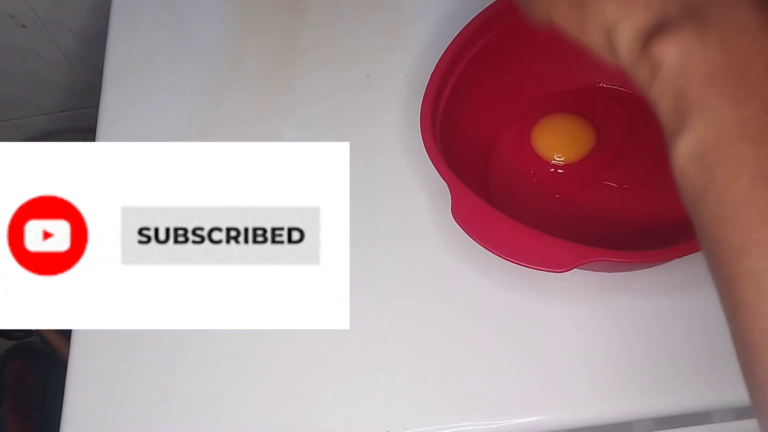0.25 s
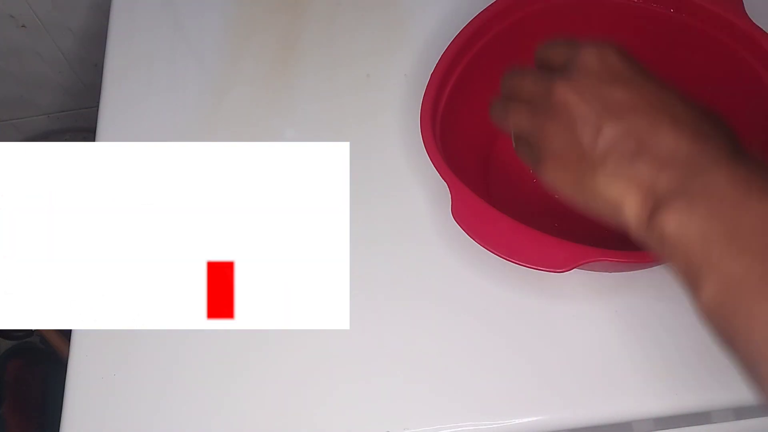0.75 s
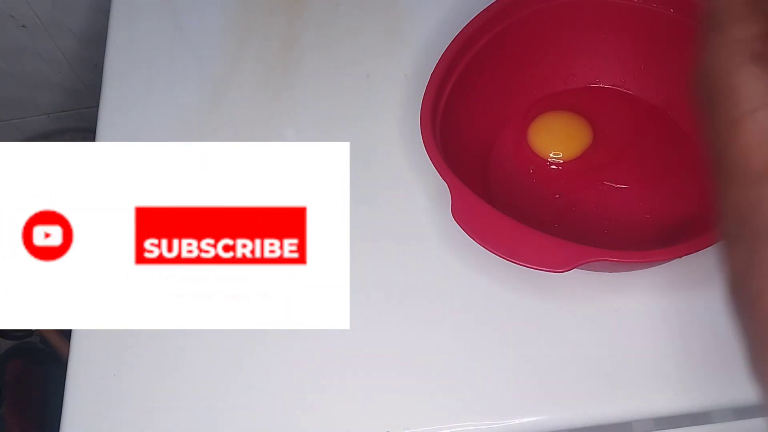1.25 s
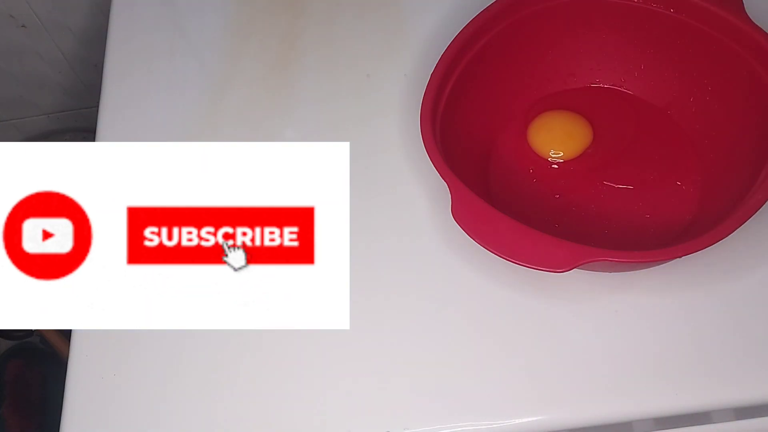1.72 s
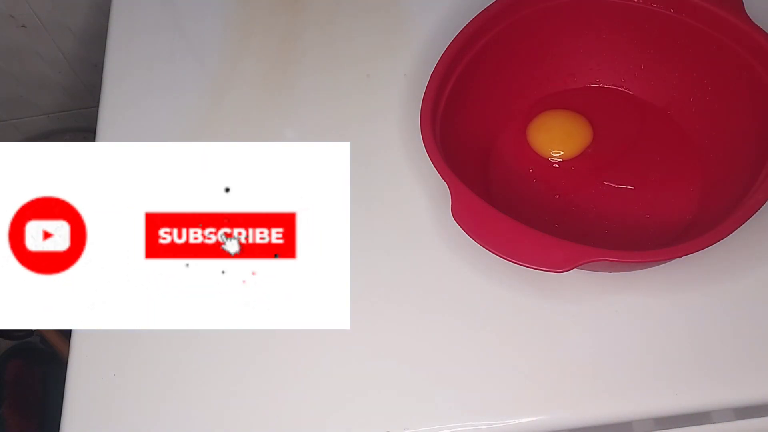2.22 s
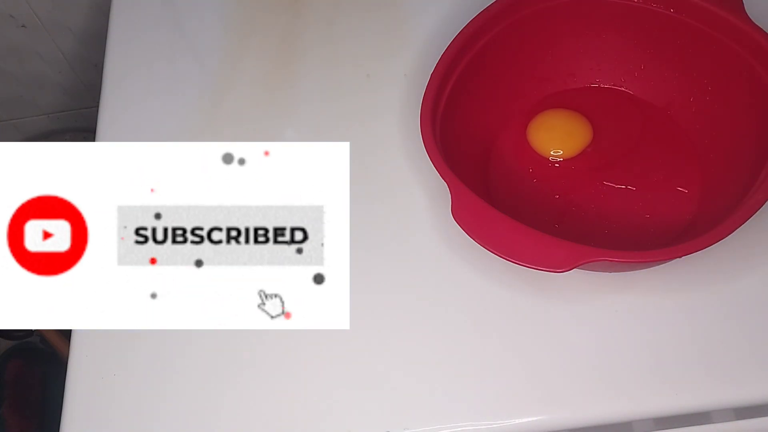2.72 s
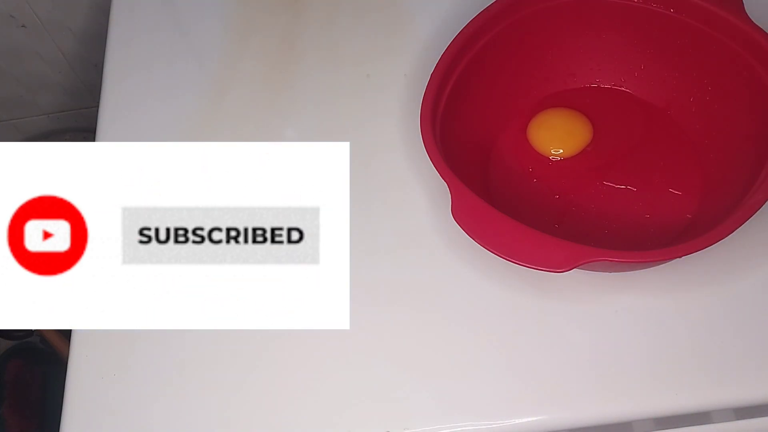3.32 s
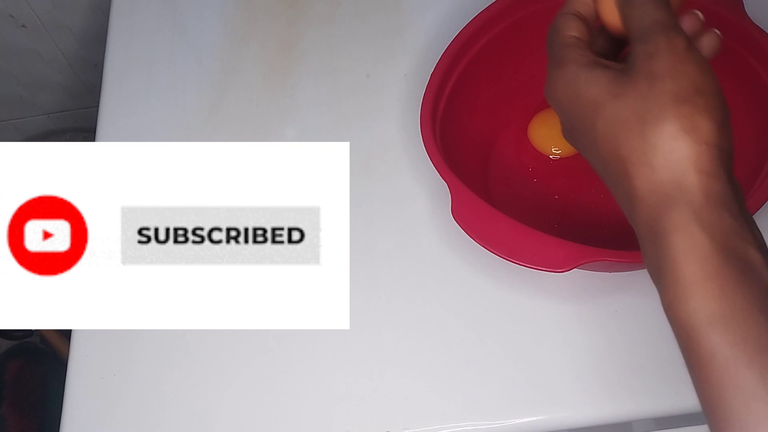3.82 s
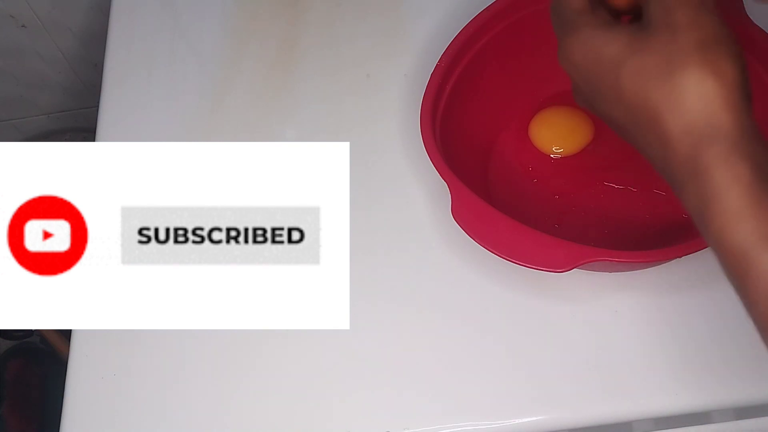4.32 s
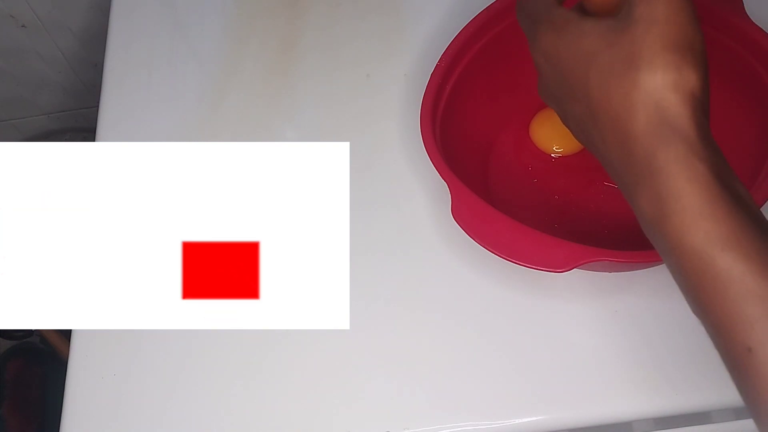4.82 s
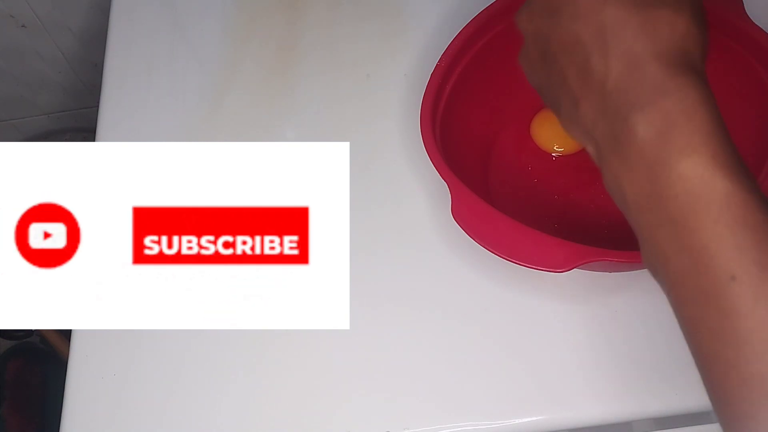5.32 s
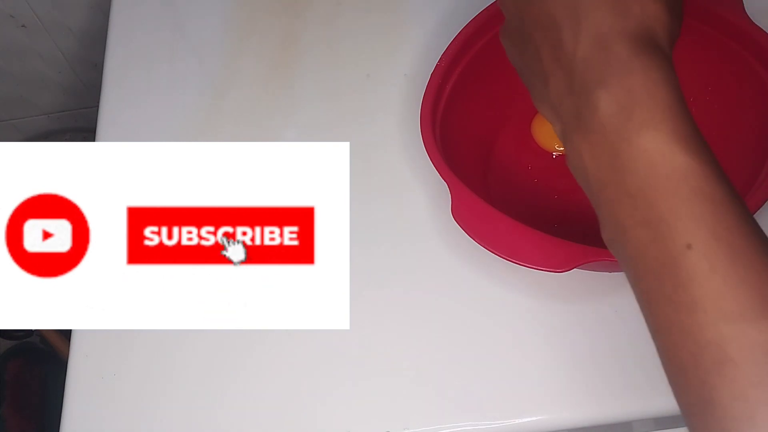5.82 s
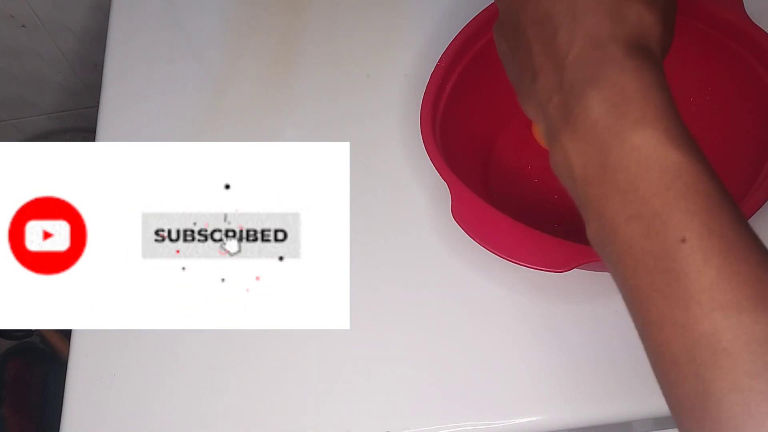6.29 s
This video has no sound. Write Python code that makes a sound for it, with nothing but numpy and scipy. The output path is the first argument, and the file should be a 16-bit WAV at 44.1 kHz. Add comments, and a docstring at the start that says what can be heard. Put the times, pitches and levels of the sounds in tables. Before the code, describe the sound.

A quiet, hard-walled kitchen with low rumble, faint hiss and weak wavering hum, heard close to the hands in stereo. Empty half eggshells knock with small dry clicks and brief hollow rings at 0.4, 0.5, 1.0 and 1.4 s, faintly at 1.8; soft finger rubs fall between them. Dull footstep-like knocks come from further off, from 1.25 s onward. At 2.25 s a cupboard catch clicks, then the door slams at 2.35 with a clatter and ringing boom that fades. Fingers rub shell at 3.5 and 3.9. A sharp tap on egg at 4.04, with a soft bowl bump, is followed by a harder, shorter, brighter one at 4.35. Shell ticks and snaps from 4.6, thickest around 5.0, thinning until 6.0. From 6.0 to 6.4 the plastic bowl booms low and softly amid snaps, and at 6.32 the shell tears in a tenth-second rasp falling in pitch.

```python
"""A low hum and faint air fill a quiet, hard-walled kitchen: wavering sines and coloured noise.
Empty half shells knock with clicks and short hollow rings; fingers rub and press shell in runs of tiny slips.
Soft knocks, like footsteps, go on further off, and a cupboard door bangs shut: noise bursts and ringing modes.
Two sharp taps, short coloured bursts, then break an egg by hand over a plastic bowl, which booms softly.
Shell snaps and crackles until the halves tear apart with a rasp of slips that falls in pitch."""
import sys
import numpy as np
from scipy import signal
from scipy.fft import rfft, irfft
from scipy.io import wavfile

SR = 44100
rng = np.random.default_rng(int(sys.argv[2]) if len(sys.argv) > 2 else 0)


def generate_wav(sig):
    """Save sig (samples, or channels by samples) to the path in sys.argv[1] as 16-bit PCM at SR."""
    pcm = np.round(np.clip(np.atleast_2d(sig).T, -1, 1) * 32767).astype(np.int16)
    wavfile.write(sys.argv[1], SR, pcm)


N = 288855
TIME = np.arange(N) / SR   # s

# All levels in the tables are relative, ahead of the mix of direct and room sound.
# Colour of skin and shell in friction. Each row: frequency in Hz, level in dB per Hz.
FRICTION_COLOUR = [(150, -15.5), (400, 2.5), (900, -8.5), (2000, -3), (5000, -5.5), (8000, -11.5),
                   (11000, -11), (14000, 3), (16000, -10.5)]


def from_db(db):
    """Decibels to gain."""
    return 10 ** (np.asarray(db) / 20)


def unit_energy(x):
    """Scale to a mean energy of one per channel."""
    return x / np.sqrt(np.mean(np.sum(x ** 2, axis=-1)) + 1e-20)


def at_hz(points, hz):
    """Read a table on a log-frequency axis."""
    known_hz, values = np.transpose(points)
    return np.interp(np.log(np.maximum(hz, 1)), np.log(known_hz), values)


def add(track, s, sound):
    """Mix a sound into a track at a time in seconds."""
    start = round(s * SR)
    track[start:start + len(sound)] += sound[:N - start]


def through(x, response):
    """Pass a signal through an impulse response."""
    return signal.fftconvolve(np.atleast_2d(x), np.atleast_2d(response), axes=-1)[:, :N]


def response_of(colour, size=4096):
    """The causal, minimum-phase response with a given colour; energy one."""
    hz = np.arange(size // 2 + 1) * SR / size
    cepstrum = irfft(np.log(from_db(at_hz(colour, hz))))
    # folding the cepstrum onto positive time makes the response minimum-phase
    cepstrum[1:size // 2] *= 2
    cepstrum[size // 2 + 1:] = 0
    return unit_energy(irfft(np.exp(rfft(cepstrum))))


def treble(x, gain_db, edge_hz=8000):
    """Shelve the treble up or down; half the gain in dB is reached at the edge."""
    hz = np.arange(1, 41) * SR / 80
    shelf_db = gain_db / (1 + (edge_hz / hz) ** 8)
    shelf = response_of(np.c_[hz, shelf_db], size=128)
    return signal.lfilter(shelf / shelf.sum(), [1], x)


def mode(hz, t60):
    """One second of a sine that falls 60 dB per t60 seconds; a negative t60 makes it grow."""
    t = TIME[:SR]
    return np.sin(2 * np.pi * hz * t) * np.exp(-np.log(1000) * t / t60)


def burst(length_s, colour):
    """A contact made of many tiny breaks that fades over its length; nearly even in spectrum, then coloured."""
    t = TIME[:SR // 8]
    fade = np.exp(-(t / length_s) ** 2)
    breaks = rng.standard_normal(len(t)) * fade
    # flatten the spectrum and restore the fade by turns
    for _ in range(4):
        spectrum = rfft(breaks, 2 * len(t))
        even = irfft(spectrum / (np.abs(spectrum) + 1e-9))[:len(t)]
        breaks = even * np.sqrt(fade)
    return unit_energy(signal.fftconvolve(breaks, response_of(colour)))


def diffuse_noise(size):
    """Stereo noise arriving from all sides: its left-right likeness varies with pitch, down to none at the top."""
    # Each row: frequency in Hz, left-right correlation (-1 to 1).
    likeness = [(30, -0.13), (70, 0.82), (130, 0.47), (290, 0.67), (640, 0.24), (1400, -0.12),
                (3000, 0.018), (15000, 0)]
    mid, side = rfft(rng.standard_normal((2, size)))
    hz = np.arange(len(mid)) * SR / size
    alike = np.clip(at_hz(likeness, hz), -1, 1)
    return irfft(np.sqrt(1 + alike) * mid + np.sqrt(1 - alike) * side * [[1], [-1]], size)


def kitchen(x, build_s, early=0.51, early_s=0.0016):
    """Bowl and worktop reflect first; then the walls take over and each band dies at its own rate."""
    # Decay of the room. Each row: frequency in Hz, time to fall by 60 dB in seconds.
    decays = [(50, 0.6), (150, 0.28), (400, 0.41), (1000, 0.36), (2700, 0.33), (6000, 0.33), (14000, 0.24)]
    t, tail = TIME[:SR * 3 // 4], 0
    field = rfft(diffuse_noise(len(t)))
    hz = np.arange(field.shape[1]) * SR / len(t)
    for k, (_, t60) in enumerate(decays):
        # overlapping bands, each fading into its neighbours
        share = at_hz([(f, j == k) for j, (f, _) in enumerate(decays)], hz)
        tail = tail + irfft(field * share, len(t)) * np.exp(-np.log(1000) * t / t60)
    onset = (1 - np.exp(-t / build_s)) * (1 + early * np.exp(-t / early_s))
    return through(x, unit_energy(tail * onset))


def near(x, left_top_db, right_top_db, lag_s=0.00021):
    """Direct sound from the hands: it reaches the right later, and each side has its own treble."""
    left = treble(x, left_top_db)
    right = np.interp(TIME - lag_s, TIME, treble(x, right_top_db))
    return np.array([left, right])


def resonate(x, hz, boost_db, q=4.8):
    """Lift a sound around one broad resonance."""
    return x + (from_db(boost_db) - 1) * signal.lfilter(*signal.iirpeak(hz, q, fs=SR), x)


def slips(envelope, per_s, spread_db):
    """Tiny slips of uneven size come at random under an envelope; mean power one."""
    chance, weight, sign = rng.random((3, SR // 2))[:, :len(envelope)]
    size_db = spread_db * np.minimum(-np.log(1 - weight), 4)
    sizes = from_db(size_db) * np.sign(sign - .5)
    return unit_energy((chance < per_s / SR) * sizes * envelope) * np.sqrt(len(envelope))


def strokes(rows, per_s, spread_db):
    """Each stroke of the fingers is a run of slips that swells and fades."""
    track = np.zeros(N)
    for s, length_s, level_db in rows:
        envelope = np.sqrt(np.hanning(int(length_s * SR)))
        add(track, s, from_db(level_db) * slips(envelope, per_s, spread_db))
    return track


def rasp(x, hz, rasp_db, t60):
    """Slips excite the whole shell and one broad resonance of it."""
    body = response_of(FRICTION_COLOUR)
    resonance = np.diff(mode(hz, t60)[:len(body) + 1])
    body = body + from_db(rasp_db) * unit_energy(resonance)
    return signal.fftconvolve(x, unit_energy(body))


def room_tone(air_db=-54.5, waver_db=2.5):
    """Diffuse low rumble with a faint hiss, and an appliance hum of sines wavering in level and phase."""
    # Colour of the air. Each row: frequency in Hz, level in dB per Hz.
    air_colour = [(12, -3), (20, 6.5), (36, -6), (74, -14.5), (130, -13.5), (190, -22), (330, -20),
                  (450, -26.5), (640, -29.5), (1300, -37), (2300, -39.5), (5500, -44), (7500, -53),
                  (16000, -50)]
    # Hum lines, the lowest first. Each row: frequency in Hz, level in dB about which it wavers.
    hum_lines = [(125, -71.5), (210, -80.5), (269, -78)]
    # The lowest line swells once. Each row: time in seconds, extra level in dB.
    hum_swell = [(.15, 1), (.48, 10), (.54, -1)]
    air = unit_energy(through(diffuse_noise(N), response_of(air_colour, size=16384))) * np.sqrt(N)
    knots = np.linspace(0, TIME[-1], 40)
    lines = []
    for hz, db in hum_lines:
        swell, phase = (np.interp(TIME, knots, row) for row in rng.standard_normal((2, len(knots))))
        tone = np.sqrt(2) * np.sin(2 * np.pi * hz * TIME + 2 * phase)
        lines.append(from_db(db + waver_db * swell) * tone)
    lowest = from_db(np.interp(TIME, *np.transpose(hum_swell))) * lines[0]
    return from_db(air_db) * air + lowest + sum(lines[1:])


def shell_knocks(direct_db=-4.5, room_db=-0.5, hollow_t60_s=0.037):
    """Empty half shells knock together: a dry click, and the air in the half shell rings briefly."""
    # Each row: start in seconds, click energy in dB, click length in seconds, hollow ring in Hz,
    # ring level in dB against the click.
    knocks = [(.374, -24, 0.0089, 1480, -2.5), (0.482, -31.5, 0.0041, 1510, -5),
              (1.027, -20.5, 0.0016, 1467, -9.5), (1.384, -20, 0.018, 1660, -11.5),
              (1.394, -20, 0.0116, 1390, -7.5), (1.423, -27.5, .02, 1330, 4), (1.838, -38, 0.0059, 1360, 6)]
    # A brief tone that swells very steeply just before 2.7 s and stops dead: start in seconds (not yet
    # heard), frequency in Hz, energy in dB, t60 in seconds (negative, so it grows).
    swelling_tone = (1.7, 652, -33, -0.1)
    knock_colour = [(300, -19), (900, -16), (1400, 7), (2500, -5), (4000, -1), (5600, 5.5), (8000, -6.5),
                    (11000, -11), (14000, -4), (16000, -6)]   # Each row: frequency in Hz, level in dB per Hz.
    track = np.zeros(N)
    for s, energy_db, length_s, hz, ring_db in knocks:
        add(track, s, from_db(energy_db) * burst(length_s, knock_colour))
        add(track, s, from_db(energy_db + ring_db) * unit_energy(mode(hz, hollow_t60_s)))
    s, hz, energy_db, t60 = swelling_tone
    add(track, s, from_db(energy_db) * unit_energy(mode(hz, t60)))
    direct = near(track, left_top_db=-3.0, right_top_db=-1.0)
    return from_db(direct_db) * direct + from_db(room_db) * kitchen(track, build_s=0.00088)


def rubs(direct_db=-14.0, room_db=-7.0):
    """Skin slides on smooth shell: dense, fine slips and a dull swish."""
    # Each row: start in seconds, length in seconds, level in dB.
    rub_rows = [(.853, 0.13, -50), (1.225, 0.12, -49.5), (1.622, .04, -48), (2.088, .082, -61),
                (3.495, 0.057, -49.5), (3.925, 0.1, -46)]
    friction = strokes(rub_rows, per_s=1500, spread_db=4.0)
    swish = rasp(friction, hz=3400, rasp_db=-16, t60=0.0013)[:N]
    track = treble(swish, -14.0, edge_hz=7700)
    direct = near(track, left_top_db=-3.0, right_top_db=-17.0)
    return from_db(direct_db) * direct + from_db(room_db) * kitchen(track, build_s=.003)


def steps(direct_db=-12.5, count=4, length_s=.014):
    """Dull, distant knocks, all equally blunt, mostly through the room; a few spots each have their own echoes."""
    # Each row: start in seconds, energy in dB.
    step_rows = [(1.254, -26), (1.629, -20), (2.686, -20), (2.968, -17), (3.629, -20), (3.672, -21),
                 (3.882, -17.5), (4.594, -18.5), (4.995, -21), (5.193, -21), (5.553, -22), (5.721, -21.5),
                 (6.054, -25), (6.196, -22), (6.461, -25)]
    step_colour = [(100, -22.5), (220, -4), (340, 0.5), (420, -6), (520, 5), (640, -8.5), (780, -5.5),
                   (1200, -15), (2200, -17.5), (3500, -30), (8000, -48)]   # Each row: frequency in Hz, level in dB per Hz.
    spots = np.zeros((count, N))
    for k, (s, energy_db) in enumerate(step_rows):
        add(spots[k % count], s, from_db(energy_db) * burst(length_s, step_colour))
    echoes = sum(kitchen(spot, build_s=0.0012) for spot in spots)
    return from_db(direct_db) * spots.sum(axis=0) + echoes


def crackle(direct_db=-10.5, room_db=-7.0):
    """Fingers press shell and it crackles: sparse, uneven ticks in one broad band of the shell."""
    # Each row: start in seconds, length in seconds, level in dB.
    presses = [(1.5, 0.15, -63), (4.615, 0.056, -58), (4.87, 0.043, -55), (5.01, 0.17, -50.5),
               (5.334, 0.072, -55.5), (5.621, 0.049, -62), (5.827, 0.075, -61.5), (5.967, 0.036, -61.5),
               (6.202, 0.047, -51.5)]
    ticks = strokes(presses, per_s=260, spread_db=5.5)
    track = treble(rasp(ticks, hz=4480, rasp_db=-4.5, t60=0.0014)[:N], -1.5)
    direct = near(track, left_top_db=-0.5, right_top_db=-22.0)
    return from_db(direct_db) * direct + from_db(room_db) * kitchen(track, build_s=0.0019)


def cracks(room_db=3.5, snap_room_db=0.0, tap_ring_db=7, snap_s=0.0014):
    """Bursts of fractures a few milliseconds long: two taps on the egg, and short snaps, which sound drier."""
    # The second tap is harder and shorter. Each row: start in seconds, energy in dB before the ring
    # is lifted, length in seconds, ring in Hz.
    tap_rows = [(4.0367, -3.26, .002, 1254), (4.3513, 1.5, 0.00087, 1620)]
    # Short, dry snaps: the first a click just before the door shuts, the rest pieces of shell.
    # Each row: start in seconds, energy in dB before the shelf, treble shelf in dB.
    snap_rows = [(2.201, -40.5, 6), (3.6802, -25.5, -4.5), (4.855, -29, -5), (4.884, -29.5, -16),
                 (5.022, -36, 0), (5.057, -29.5, 0.5), (5.097, -27.5, 5), (5.173, -30, 20.5),
                 (6.029, -35, 2), (6.209, -35, 6), (6.331, -26, -3), (6.359, -24, 4.5)]
    crack_colour = [(100, -36), (220, -28), (370, -5), (600, -7), (850, -13), (1100, -10.5), (1600, -8),
                    (2600, -7), (4600, 0.5), (6500, -1), (8000, -18.5), (9500, -8.5), (11000, -18),
                    (13500, -3.5), (16000, -9)]   # Each row: frequency in Hz, level in dB per Hz.
    taps, snaps = np.zeros((2, N))
    for s, energy_db, length_s, hz in tap_rows:
        tap = resonate(burst(length_s, crack_colour), hz, tap_ring_db)
        add(taps, s, from_db(energy_db) * tap)
    for s, energy_db, top_db in snap_rows:
        add(snaps, s, from_db(energy_db) * treble(burst(snap_s, crack_colour), top_db))
    sent = from_db(room_db) * taps + from_db(snap_room_db) * snaps
    room = kitchen(treble(sent, -.6), build_s=0.00076, early=2.6, early_s=0.002)
    return near(taps + snaps, left_top_db=2.5, right_top_db=-6.5) + room


def door(direct_db=-13.5, room_db=-1.0):
    """The catch clicks; each hit clatters, mostly by way of the walls, and sets the cupboard ringing."""
    # The door meets its catch, then slams and rattles. Each row: start in seconds, clatter energy in dB,
    # length in seconds, thud energy in dB, catch click energy in dB.
    hits = [(2.243, -48, 0.0015, -44, -22), (2.2622, -8.5, 0.0074, -19, -18),
            (2.3502, 8.5, 0.0028, -8.5, -21), (2.3597, 9.5, 0.0039, 7, -7.5), (2.377, 2, 0.0124, -18, -29)]
    # Modes of the cupboard. Each row: frequency in Hz, level in dB, t60 in seconds.
    cupboard = [(171, -16.5, 0.53), (262.4, -3, 0.45), (314, -8.5, 0.35), (374.6, -7, 0.4),
                (385.2, 6.5, 0.12), (400, 3.5, 0.12), (451, -0.5, 0.25), (539, -24, 0.14),
                (515.6, -9, 0.22), (574, -27, .34), (620, -19.5, 0.12), (741, -8.5, 0.39),
                (777, -6.5, 0.26), (958, -21.5, 0.28), (1056, -22.5, 0.2), (1300, -13, 0.09),
                (2155, -7.5, 0.31), (2220, -24, 0.235)]
    # Colours of clatter and catch. Each row: frequency in Hz, level in dB per Hz.
    door_colour = [(30, -6.5), (80, -22), (150, -5), (200, -7), (280, -1), (470, 4), (650, 2.5), (1000, -2),
                   (1400, -14), (2300, -10), (4500, -17), (6500, -25), (8200, -40.5), (11000, -46),
                   (14000, -31.5), (16000, -65)]
    catch_colour = [(300, -33), (900, -3), (1400, 7.5), (2500, -3), (3500, -16), (5500, -2.5),
                    (8000, -16.5), (11000, -15), (14000, -12.5), (16000, -13)]
    clatter, thud = np.zeros((2, N))
    # neighbouring modes start with opposite signs
    modes = [(-1) ** k * from_db(db) * mode(hz, t60) for k, (hz, db, t60) in enumerate(cupboard)]
    ring = unit_energy(sum(modes))
    for s, clatter_db, length_s, thud_db, click_db in hits:
        add(clatter, s, from_db(clatter_db) * burst(length_s, door_colour))
        add(clatter, s, from_db(click_db) * burst(length_s, catch_colour))
        add(thud, s, from_db(thud_db) * ring)
    return thud + from_db(direct_db) * clatter + from_db(room_db) * kitchen(clatter, build_s=0.001043)


def bowl(direct_db=-14.5, room_db=-7.5):
    """The hand bumps the bowl, and soft plastic answers with a low, short boom."""
    # Each row: start in seconds, energy in dB, length in seconds.
    bumps = [(4.032, -12.5, 0.0029), (6.022, -20.5, .01), (6.214, -17.5, .037), (6.238, -13, 0.012),
             (6.349, -19, 0.061)]
    bowl_colour = [(100, -13), (220, -7.5), (290, 0.5), (350, 1.5), (430, -12.5), (560, -19), (760, -30),
                   (1100, -29.5), (4000, -49)]   # Each row: frequency in Hz, level in dB per Hz.
    track = np.zeros(N)
    for s, energy_db, length_s in bumps:
        add(track, s, from_db(energy_db) * burst(length_s, bowl_colour))
    return from_db(direct_db) * track + from_db(room_db) * kitchen(track, build_s=0.0024)


def tear(direct_db=-10.5, room_db=-3.5, q=1.5, hiss_db=-2.5, hiss_hz=3500, count=8):
    """The halves part: slips ring at a pitch that sinks in steps as the gap widens, over a thin hiss."""
    start_s, level_db, swell_db = 6.322, -49, 3
    attack_s, hold_s, release_s = 0.0023, 0.066, 0.028
    closed_hz, open_hz, opening_s = 5600, 2410, .076
    t = TIME[:SR // 4]
    envelope = np.minimum(t / attack_s, 1) * np.exp(-np.maximum(t - hold_s, 0) / release_s)
    # the rasp swells until the halves part
    envelope = envelope * from_db(swell_db * np.minimum(t / hold_s, 1))
    run = from_db(level_db) * slips(envelope, per_s=890, spread_db=3.0)
    stage = np.round(np.minimum(t / opening_s, 1) * (count - 1))
    track = np.zeros(N)
    for k, hz in enumerate(np.geomspace(closed_hz, open_hz, count)):
        peak = signal.iirpeak(hz, q, fs=SR)
        ring = signal.lfilter(*peak, signal.lfilter(*peak, signal.unit_impulse(len(t))))
        add(track, start_s, signal.fftconvolve(run * (stage == k), unit_energy(ring)))
    high_pass = signal.butter(2, hiss_hz, "high", fs=SR, output="sos")
    hiss = signal.sosfilt(high_pass, response_of(FRICTION_COLOUR))
    add(track, start_s, from_db(hiss_db) * signal.fftconvolve(run, unit_energy(hiss)))
    direct = near(track, left_top_db=-6.0, right_top_db=-15.0)
    return from_db(direct_db) * direct + from_db(room_db) * kitchen(track, build_s=.003)


def scene():
    """Hands at the bowl, the kitchen behind them."""
    background = room_tone() + steps() + door()
    hands = shell_knocks() + rubs() + crackle() + cracks() + bowl() + tear()
    return background + hands


def record(dry):
    """Brighten the left, dull the right, and cut the top steeply."""
    sides = np.array([treble(dry[0], 2.1), treble(dry[1], -4.0)])
    cutoff_hz = 16200
    low_pass = signal.ellip(10, .2, 80, cutoff_hz, fs=SR, output="sos")
    return signal.sosfilt(low_pass, sides)


dry = scene()
out = record(dry)
generate_wav(out)
```